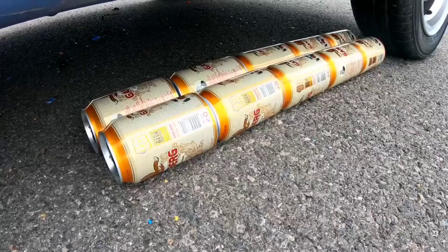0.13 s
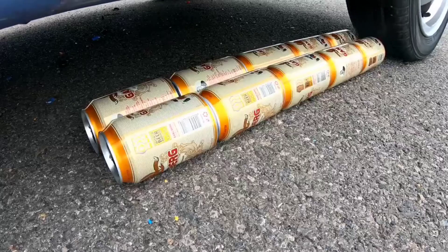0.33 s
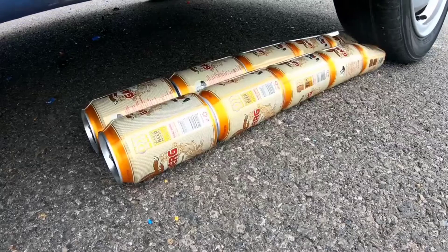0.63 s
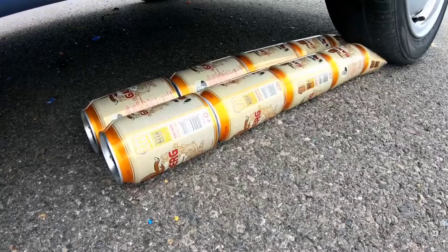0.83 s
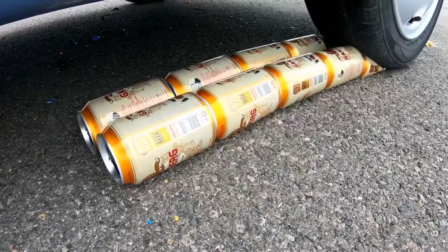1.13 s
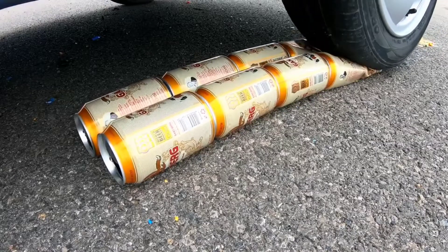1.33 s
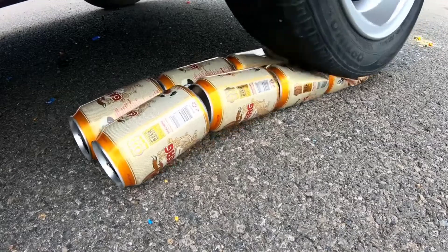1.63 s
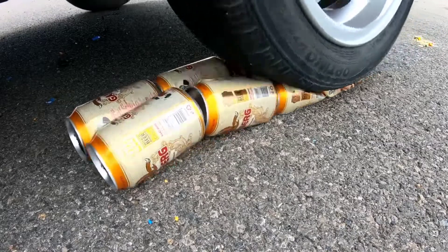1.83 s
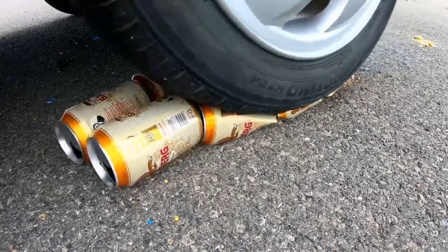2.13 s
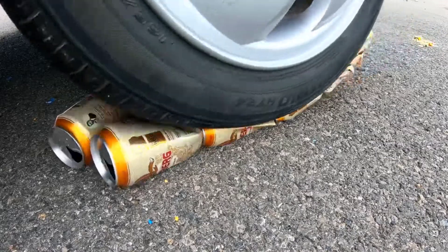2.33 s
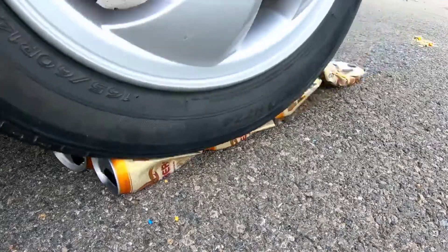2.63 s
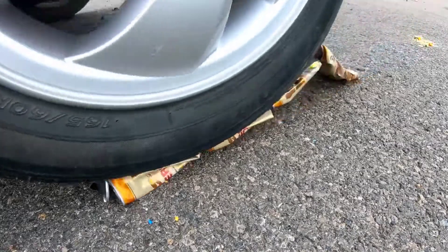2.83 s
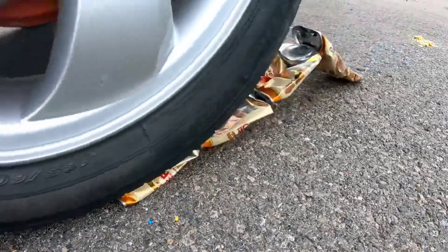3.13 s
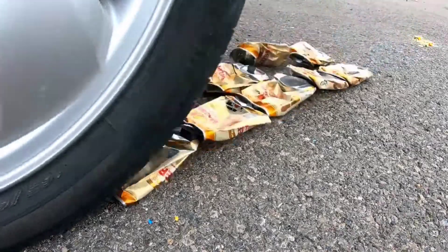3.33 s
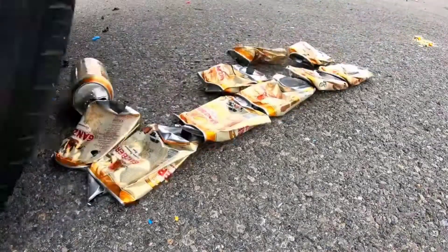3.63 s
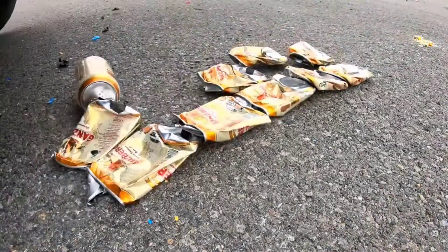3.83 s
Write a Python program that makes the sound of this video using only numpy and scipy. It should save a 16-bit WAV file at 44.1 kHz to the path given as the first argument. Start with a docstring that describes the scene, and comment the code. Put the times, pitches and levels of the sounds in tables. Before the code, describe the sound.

Empty metal cans are crushed by a car tyre on asphalt, close to a small camera. After brief silence, a low wavering engine hum with soft hiss starts at 0.13 s. From 0.8 to 3.3 s, dense crackles, sharp metallic snaps and hollow thumps crowd together, growing brighter and wider, treble leaning right. Then flattened cans scrape and tick until about 3.9 s, leaving faint engine hum.

```python
"""After a short silence an engine, heard by a small camera on the asphalt, hums as a wavering tone with hiss.
A car idles over two rows of empty metal cans: they puff hollow thumps (low damped sines) and crackle (tiny
rings and noise), and their walls buckle in sharp snaps (bursts of ringing noise). The sound widens, its treble
leaning right, as the wheel nears. Late on, flattened cans drag (rough noise rings the sheet) and spring back in
ticks (treble bursts), while the engine fades as the wheel rolls past."""
import sys
import numpy as np
from scipy import signal
from scipy.fft import rfft, irfft
from scipy.io import wavfile
from scipy.ndimage import uniform_filter1d

SR = 44100
rng = np.random.default_rng(int(sys.argv[2]) if len(sys.argv) > 2 else 0)


def gain_from_db(level_db):
    """Turn a decibel level (scalar or array-like) into a linear amplitude factor."""
    decades = np.asarray(level_db, float) / 20
    return 10 ** decades


def put_to_file(sound):
    """Save the sound as 16-bit audio at rate SR, in the file named by the first command-line argument."""
    columns = np.atleast_2d(sound).T  # one column per channel
    safe = np.clip(columns, -1, 1)
    whole_steps = np.round(safe * 32767)
    wavfile.write(sys.argv[1], SR, whole_steps.astype(np.int16))


N = 176400  # samples, 4 s
OPENS_S = 0.128

# engine over time: (time [s], firing tone [dB], whirr and hiss [dB], rumble [dB])
ENGINE_LEVELS = [(.14, -35, 1.5, -35), (.76, -34.5, 0.5, -38.5), (1.26, -41, -5, -44),
                 (1.48, -32, 3.5, -29), (1.75, -50, 0, -40), (2.06, -53, 4.5, -39), (2.2, -32.5, 5, -39),
                 (2.5, -35, -2, -32.5), (2.7, -46, -1.5, -41), (3.3, -44, -3, -33),
                 (3.75, -36.5, -10.5, -41.5), (3.88, -39.5, -16, -46.5), (4, -41, -21, -39)]
# colour of the engine hiss: (frequency [Hz], level [dB per Hz])
ENGINE_HISS_COLOUR = [(59, -13.5), (100, -3), (373, -6.5), (415, -9), (452, -11), (691, -19), (872, -14),
                      (950, -23.5), (1250, -17), (1720, -24.5), (2400, -21.5), (4000, -31), (4700, -31),
                      (6000, -43.5), (10000, -50), (16000, -76)]
# steady whirring tones of the engine: (average frequency [Hz], level [dB])
ENGINE_WHIRRS = [(226.1, -48), (463.0, -47.5), (796.7, -53.5), (1233, -49)]
FIRING_HZ, ENGINE_HISS_DB = 28.3, -33  # average firing pitch; hiss level beside the whirrs

# collapsing can bodies: (time [s], level [dB], pitch [Hz], a third of the periods taken to fade 60 dB [cycles])
CAN_THUMPS = [(0.537, -24.5, 86, 3.3), (0.873, -5.5, 228, 3.7), (0.946, -0.5, 240, 2.2),
              (1.039, -13.5, 254, 3.9), (1.156, -14, 330, 4.9), (1.194, -18.5, 363, 7.5),
              (1.273, -21, 383, 2.8), (1.365, -9.5, 320, 2.4), (1.435, -16, 330, 2.5),
              (1.622, -1, 286, 1.9), (1.673, -11.5, 149, 1.5), (1.704, -6, 166, 2.4), (1.821, -13, 303, 3),
              (1.846, -15.5, 302, 5.4), (1.877, -6.5, 297, 2.8), (1.925, -6.5, 317, 2.5),
              (1.95, -16, 170, 4.6), (1.979, -7.5, 163.5, 3), (2.055, -17, 138, 6.6),
              (2.128, -12.5, 140, 4.2), (2.144, -20, 355, 4), (2.2, -19, 125, 3.1), (2.268, -3.5, 155, 1.6),
              (2.365, -4.5, 141, 2.2), (2.372, -9, 335, 3.7), (2.405, -15.5, 145, 2.6),
              (2.545, -6.5, 415, 3.2), (2.624, -10.5, 149, 2.7), (2.73, -7.5, 352, 2.5),
              (2.746, -8.5, 150, 1.84), (2.81, -7, 436, 3.4), (2.85, -6, 400, 1.8), (2.902, -16, 382, 3.3),
              (2.936, -12, 377, 2.5), (2.973, -17, 255, 2.9), (3.031, 0, 236, 1.46), (3.089, -13, 283, 2.3),
              (3.153, -6.5, 370, 3.2), (3.236, -1, 175, 1.64), (3.453, -24, 109, 1.6),
              (3.61, -30.5, 100, 2.4)]
# air note of the last cans: (time [s], level [dB])
HOLLOW_LEVELS = [(2.6, -60), (2.9, -39.5), (3.3, -35), (3.75, -49.5), (3.85, -51)]
HOLLOW_HZ = 261.6
THUMP_LAG_S = 0.00526  # each thump starts this long after its listed time

# small crackle under the tyre: (time [s], level [dB], groan of the can walls relative to it [dB])
CRACKLE_LEVELS = [(.8, -34, 2), (0.849, -18.5, -9), (.89, -26, -2), (.93, -32.5, -26), (.96, -19.5, -6),
                  (.99, -44.5, -9), (1.04, -28, -15), (1.11, -39, -12), (1.172, -20, -11.5),
                  (1.22, -30.5, -9), (1.27, -17.5, -21), (1.32, -29, -11.5), (1.36, -22.5, -9),
                  (1.43, -27, -15), (1.47, -23, -11), (1.56, -31, -9), (1.65, -28.5, -12),
                  (1.71, -14.5, -18.5), (1.75, -25, -6.5), (1.79, -21, -11.5), (1.88, -18.5, -18),
                  (1.91, -24, -13), (1.96, -20.5, -5), (2.004, -35, -9), (2.03, -20.5, -10.5),
                  (2.08, -16.5, -12.5), (2.104, -23, -10.5), (2.145, -15, -6.5), (2.19, -24.5, -17),
                  (2.27, -26, -4), (2.33, -52, -3), (2.398, -17, -15), (2.47, -42, 6), (2.551, -25, -9),
                  (2.58, -30.5, -18), (2.63, -24.5, -5.5), (2.69, -32.5, -6), (2.74, -36.5, 2),
                  (2.87, -26.5, -4), (2.91, -28, -24), (2.96, -31, -7.5), (3.07, -39, 5.5),
                  (3.16, -22, -14), (3.2, -27, -3), (3.26, -31, -3), (3.4, -57, -12)]
GRAINS_PER_S = 900
CRACKLE_TREBLE_DB, TREBLE_RISE_DB_PER_S = -34.5, 5.5  # brighter as the wheel nears
# colour of the crackling walls and of the grit: (frequency [Hz], level [dB per Hz])
METAL_COLOUR = [(350, -24.5), (600, -1), (1450, 3), (2570, 3), (3730, 1), (4570, -4), (5500, -18.5),
                (7150, -50), (12100, -120)]
# colour of the treble crack: (frequency [Hz], level [dB per Hz])
TREBLE_COLOUR = [(3240, -42), (5500, 9.5), (7500, -6), (9300, 6.5), (11500, -14.5), (15500, -21)]
WALL_Q, WALL_SWING_DB = 21.5, 5.5  # sharpness of the wall resonances, how far each comes and goes

# wall buckles: (time [s], level [dB], low ring [Hz], high ring [Hz], high ring relative [dB],
# treble crack relative [dB], length [s])
WALL_SNAPS = [(0.85, -11.5, 596, 2030, -3.5, -10.5, 0.036), (0.866, -6.5, 640, 1520, -3.5, -36, 0.041),
              (0.88, -22.5, 1450, 1400, 15.5, -35, 0.018), (0.902, -8, 770, 2150, -10, -20, 0.021),
              (0.949, -8, 752, 1535, -0.5, -31, 0.024), (1.024, -26, 1450, 1470, -5, -14, 0.025),
              (1.048, -30, 501, 1580, 6, -28, 0.02), (1.081, -5.5, 1590, 1650, -21, -30, 0.023),
              (1.149, -19, 1230, 1980, 3, -26, 0.026), (1.167, -17, 1310, 2540, 4.5, -15, 0.022),
              (1.185, -13.5, 1457, 1830, 4.5, -36, 0.067), (1.198, -11, 1420, 1620, -9, -20, 0.029),
              (1.24, -22.5, 1430, 1460, 9.5, -15, 0.012), (1.253, -18.5, 1500, 1830, 7, -9.5, 0.047),
              (1.308, -17.5, 1430, 1525, 10, -42, 0.016), (1.335, -8.5, 775, 1500, -15, -32, 0.016),
              (1.348, -14.5, 1295, 4300, -3, -10.5, 0.035), (1.373, -21, 1320, 2230, 0, -21, 0.024),
              (1.393, -13.5, 1370, 2790, 7, -12, 0.021), (1.403, -10, 1460, 3530, 0, -23, 0.02),
              (1.434, -21, 507, 2000, 0, -35, 0.021), (1.447, -19, 1410, 2220, 5, -37, 0.022),
              (1.463, -6.5, 1155, 3720, -2, -44, 0.019), (1.497, -13.5, 507, 1980, -14, -26, 0.018),
              (1.523, -7, 1380, 1550, -24, -39, 0.028), (1.579, -9.5, 527, 3700, 4, -37, 0.013),
              (1.604, -3.5, 953, 1490, -8.5, -25, 0.021), (1.629, -11.5, 1370, 1950, 4, -42, 0.024),
              (1.672, -10.5, 1500, 1560, -2.5, -19, 0.02), (1.697, -10, 1240, 1700, -16, -25, 0.017),
              (1.771, -8, 475, 1990, -19, -22, 0.035), (1.794, -5.5, 550, 1640, -11, -13.5, 0.015),
              (1.857, -11, 1287, 1650, -16, -36, 0.052), (1.883, -2.5, 1173, 2730, -25, -23.5, 0.017),
              (1.928, -16.5, 830, 3730, 2, -12, 0.028), (1.959, -12, 820, 2440, -25, -11, 0.023),
              (1.963, -13, 920, 1500, -12, -31, 0.031), (1.982, -4.5, 786, 2375, -18, -33, 0.012),
              (2.02, -10.5, 1500, 3100, -5, -18, 0.027), (2.034, -9.5, 1410, 1640, -5, -12, 0.018),
              (2.058, -9.5, 1080, 3300, 0.5, -13, 0.028), (2.08, -11.5, 579, 3050, 1, -16.5, 0.032),
              (2.125, -8, 1020, 1990, -16, -43, 0.023), (2.138, -10, 920, 2120, -12, -27, 0.033),
              (2.219, -23, 496, 1500, 7, -31, 0.03), (2.22, -20, 1490, 3510, 8.5, -27, 0.018),
              (2.243, -8.5, 1100, 3730, -6, -31, 0.017), (2.261, -8.5, 520, 3130, -0.5, -36, 0.036),
              (2.272, -6, 1494, 1446, -12, -42, 0.018), (2.305, -12, 1340, 1816, 5, -42, 0.016),
              (2.338, -18, 550, 3980, 6.5, -25, 0.01), (2.348, -13.5, 1260, 3000, -12, -21, 0.015),
              (2.355, -9, 610, 1760, -3.5, -29, 0.022), (2.389, -5.5, 1020, 1745, -6, -14, 0.0063),
              (2.417, -7, 636, 1755, -1.5, -11.5, 0.0037), (2.441, -8, 514, 3210, -1, -22, 0.015),
              (2.479, -14, 960, 3100, 1.5, -36, 0.015), (2.493, -7, 1170, 2180, -18, -15.5, 0.012),
              (2.543, -2.5, 985, 1780, -8.5, -23, 0.0074), (2.601, -9, 495, 3690, 3.5, -42, 0.01),
              (2.627, -4.5, 700, 1935, -2, -16.5, 0.0058), (2.705, -19.5, 1080, 2350, 1.5, -21, 0.02),
              (2.729, -8.5, 510, 2430, -2.5, -21, 0.0098), (2.743, -15.5, 520, 2470, 1, -18, 0.022),
              (2.756, -21.5, 523, 2500, -8, -1, 0.012), (2.779, -9, 560, 2830, -7, -8, 0.0049),
              (2.816, -16, 483, 1620, -19, -9.5, 0.02), (2.829, -19, 600, 4500, -3, -5, 0.01),
              (2.835, -11, 643, 1660, -17, -24, 0.021), (2.858, -17, 925, 3670, 5, -9.5, 0.044),
              (2.88, -8, 1250, 1800, -11, -15, 0.026), (2.924, -12, 667, 5100, -1, -16.5, 0.028),
              (2.946, -12, 900, 3000, -1, -37, 0.026), (2.952, -17, 1030, 2870, -18, -38, 0.028),
              (2.977, -10.5, 530, 2130, -21, -33, 0.031), (2.986, -27, 1210, 3000, -10, 1, 0.013),
              (2.99, -6.5, 2060, 4170, -1.5, -12, 0.021), (2.999, -25, 2000, 3570, 5, -20, 0.014),
              (3.016, -32, 1500, 4500, 10, -17, 0.01), (3.032, -10, 980, 1900, -4, -18, 0.022),
              (3.04, -11, 730, 2070, -19, -22, 0.026), (3.094, -10, 510, 2090, -5.5, -9.5, 0.021),
              (3.127, -22, 708, 2630, 6, -3, 0.012), (3.166, -15.5, 726, 1970, 2, -9, 0.049),
              (3.217, -20.5, 815, 1940, 8.5, -8, 0.013), (3.244, -14.5, 835, 2300, -12, -9, 0.029),
              (3.287, -14.5, 527, 2130, -6, -12, 0.028), (3.308, -15, 1300, 3620, -0.5, -5, 0.014),
              (3.404, -12.5, 760, 2850, -27, -29, 0.031), (3.519, -18.5, 1320, 2460, 0.5, -9, 0.017),
              (3.542, -9.5, 1090, 5320, 6.5, -6, 0.0049), (3.598, -19, 920, 2310, -5, -14, 0.025),
              (3.614, -20, 1030, 1500, 0, -15, 0.03), (3.6242, -5.5, 1830, 3200, -10.5, -13, 0.016),
              (3.642, -17.5, 1160, 1890, 3, -17, 0.031), (3.71, -18, 1385, 1680, -24, -9, 0.031),
              (3.756, -11, 745, 2820, 2.5, -8.5, 0.032), (3.916, -34, 920, 3200, -15, -24, 0.031)]
# ringing tones of a can: (frequency [Hz], level [dB], decay time before a stretch and a 0.12 s cap [s])
CAN_MODES = [(221, -20, 0.24), (465.2, 14, 0.22), (1210, -34, 0.64), (1500, -28, 0.52)]
SNAP_CYCLES, TAIL_T60_S = 18.6, 0.09
RISE_SHARE, CRACK_SHARE = 0.074, 0.18  # parts of a snap's length

# flattened cans dragging on the asphalt: (time [s], level [dB])
DRAG_LEVELS = [(3.25, -31.5), (3.38, -35.5), (3.42, -27.5), (3.53, -35), (3.6, -34.5), (3.66, -29),
               (3.72, -29.5), (3.8, -34), (3.86, -32.5), (3.885, -52), (3.93, -60)]
# what the flattened sheet rings with: (frequency [Hz], width before broadening [Hz], level [dB])
SHEET_RINGS = [(805, 104, 7.5), (1110, 47, 10), (1810, 45, 6), (2060, 33, -5), (2640, 52, 6.5),
               (3200, 28, 5.5)]
# bright ticks as the flattened cans spring back: (time [s], level [dB], pitch [Hz])
SPRING_TICKS = [(3.3923, -25, 4500), (3.4255, -23.5, 5900), (3.469, -20, 4000), (3.495, -27, 3900),
                (3.558, -18.5, 2700), (3.684, -24.5, 4000), (3.7339, -21, 3900), (3.7796, -22, 3510)]

# colour of the sideways spread: (frequency [Hz], level [dB])
SIDE_COLOUR = [(60, -8.5), (110, -17), (200, -18), (380, -21.5), (700, -11.5), (1290, -10), (2380, -6.5),
               (4400, -4.5), (8120, 0), (15000, 4.5)]
# stereo width as the wheel nears: (time [s], treble [dB], bass and middle [dB])
WIDTH_LEVELS = [(0, -14, -29), (2.15, -15.5, -27.5), (2.5, -4, -10), (2.8, -1.5, -5), (3.3, -1, -3),
                (4, -1.5, 0.5)]
# the camera housing colours everything: (frequency [Hz], level [dB])
HOUSING_COLOUR = [(4000, 0), (4650, 2), (5600, -4), (7000, 0.5), (8200, -0.5), (10400, -1), (11500, -5.5),
                  (14500, -2), (16000, -22)]


def col(table, t, k):
    """Column k of a curve table at times t."""
    return np.interp(t, np.array(table)[:, 0], np.array(table)[:, k])


def unit(x):
    """Scale to rms 1."""
    return x / np.sqrt(np.mean(x ** 2))


def colour(x, table, size=2048):
    """Causal minimum-phase filter from (frequency [Hz], level [dB]) points."""
    a = np.array(table)
    hz = np.arange(size // 2 + 1) * SR / size
    log_gain = np.interp(np.log(hz + 1), np.log(a[:, 0]), a[:, 1]) * np.log(10) / 20
    # folding the cepstrum forward in time makes the filter minimum-phase
    cepstrum = irfft(log_gain)
    cepstrum[1:size // 2] *= 2
    cepstrum[size // 2 + 1:] = 0
    return signal.fftconvolve(x, irfft(np.exp(rfft(cepstrum))))[:len(x)]


def walk(rate):
    """Random levels held 1 / rate s and slewed; spread near 1."""
    k = int(SR / rate)
    held = np.repeat(rng.standard_normal(N // k + 1), k)
    return 1.338 * uniform_filter1d(uniform_filter1d(held, k), k)[:N]


def fade(t, t60):
    """Exponential decay, down 60 dB after t60 seconds."""
    return np.exp(-np.log(1000) * t / max(t60, 1e-3))


def add(out, s, x):
    """Mix x in at time s."""
    i = int(s * SR)
    out[i:i + len(x)] += x[:len(out) - i]


def ring(hz, cycles, rise_s):
    """A damped sine that loses 60 dB in 3 x cycles periods."""
    t = np.arange(int(3 * cycles / hz * SR)) / SR
    rise = 1 - np.exp(-t / max(rise_s, 1e-5))
    return np.sin(2 * np.pi * hz * t) * fade(t, 3 * cycles / hz) * rise


def band(hz, q, count):
    """Noise ringing in one resonance of sharpness q, rms 1."""
    b, a = signal.iirpeak(min(hz, 0.45 * SR), max(q, 0.3), SR)
    return unit(signal.lfilter(b, a, rng.standard_normal(count + 400))[400:])


def engine(t):
    """A wavering firing tone, faint whirring tones, rumble, and broad noise that throbs with the firings."""
    phase = 2 * np.pi * np.cumsum(FIRING_HZ * (1 + 0.0954 * walk(7.0))) / SR
    firing = np.sqrt(2) * np.sin(phase) * gain_from_db(col(ENGINE_LEVELS, t, 1) + 0.5 * walk(14))
    hiss = unit(colour(rng.standard_normal(N), ENGINE_HISS_COLOUR, size=8192))
    hiss = hiss * (1 + 0.28 * np.sin(phase)) * gain_from_db(1.2 * walk(9))
    whirr = np.zeros(N)
    for hz, db in ENGINE_WHIRRS:
        whirr_phase = 2 * np.pi * np.cumsum(hz * (1 + 0.0075 * walk(10))) / SR
        whirr += gain_from_db(db + 2 * walk(35)) * np.sin(whirr_phase)
    rumble = gain_from_db(col(ENGINE_LEVELS, t, 3) - 0.5 + 3.3 * walk(5.99)) * band(51.5, 1.47, N)
    return firing + rumble + gain_from_db(col(ENGINE_LEVELS, t, 2)) * (gain_from_db(ENGINE_HISS_DB) * hiss + whirr)


def thumps(t):
    """A can caves in and pushes out its air in a few low cycles; the last cans hum like blown bottles."""
    out = np.zeros(N)
    for s, db, hz, cycles in CAN_THUMPS:
        start, cycles = s + THUMP_LAG_S, max(cycles, 0.7)
        add(out, start, gain_from_db(db + 6.5) * ring(hz, cycles, 0.0055))
        add(out, start, gain_from_db(db - 2.5) * ring(1.845 * hz, cycles, 0.0015))
        add(out, start, gain_from_db(db) * ring(0.66 * hz, 1.0, 0.011))
        # the can's hollow rattles on
        add(out, start, gain_from_db(db - 14.5) * fade(t[:2500], 0.06) * band(333.0, 4.0, 2500))
    return out + gain_from_db(col(HOLLOW_LEVELS, t, 1)) * band(HOLLOW_HZ, 25.0, N)


def walls():
    """Dented walls: many narrow resonances that wake and die on their own as the creases move."""
    patches = np.zeros(N)
    for hz in 450 * 11.0 ** np.linspace(0, 1, 20):
        patches += np.sqrt(hz) * gain_from_db(WALL_SWING_DB * walk(45)) * band(hz, WALL_Q, N)
    return unit(colour(unit(patches) + gain_from_db(-8) * rng.standard_normal(N), METAL_COLOUR))


def crackle(t):
    """Many tiny creases: clicks of widely scattered size, each ringing a few cycles at its own pitch."""
    first, last = CRACKLE_LEVELS[0][0], CRACKLE_LEVELS[-1][0]
    rings, pings, clicks = np.zeros((3, N))
    patch = 0.5 + 0.5 * np.tanh(0.8 * walk(35))  # the patch of wall that is creasing sets the pitch
    for place, chance, p, q in rng.random((int(GRAINS_PER_S * 4), 4)):
        s = place * N / SR
        size = min((1 - chance) ** -0.6, 8.0)  # mostly small, a few large
        hz = 600 * 7.59 ** (0.583 * p + 0.487 * patch[int(place * N)])
        add(rings, s, size * ring(hz, 4.5 + 9 * q, 0.00016))
        add(pings, s, size * ring(4500 * 1.8 ** q, 6 + 25 * p, 0.0001) * gain_from_db(-9 * q))
        clicks[int(s * SR)] += size
    puff = signal.fftconvolve(clicks, fade(np.arange(1500) / SR, 0.016))[:N]
    mids = unit(rings) + gain_from_db(2) * unit(puff * walls())
    treble = unit(puff * colour(rng.standard_normal(N), TREBLE_COLOUR)) + gain_from_db(-17) * unit(pings)
    treble = gain_from_db(CRACKLE_TREBLE_DB + TREBLE_RISE_DB_PER_S * (t - first)) * treble
    groan = gain_from_db(4.18 * walk(25.45)) * (band(187.0, 1.32, N) + 0.83 * band(357.0, 3.4, N))
    groan = gain_from_db(col(CRACKLE_LEVELS, t, 2)) * groan
    on = np.clip((t - first) / 0.044, 0, 1) * np.clip((last - t) / 0.023, 0, 1)
    return on * gain_from_db(col(CRACKLE_LEVELS, t, 1) + 1.55 * walk(60)) * (0.49 * mids + treble + groan)


def snaps():
    """Each buckle shakes two patches of wall for its length, rattles, cracks in the treble and rings the can."""
    tone, body, treble, hits = np.zeros((4, N))
    t = np.arange(3000) / SR
    # the rattle builds after the first crack
    rattle = (1 - np.exp(-t / 0.0034)) * fade(t, TAIL_T60_S)
    for s, db, low_hz, high_hz, high_db, treble_db, length in WALL_SNAPS:
        shape = 1.7 * fade(t, length) * (1 - np.exp(-t / max(RISE_SHARE * length, 1e-5)))
        # noise: the two patches, a broad wash, a treble burst at a random pitch
        patches = gain_from_db(-11.0) * band(low_hz, 18.0, len(t)) + gain_from_db(high_db - 13.5) * band(high_hz, 26.0, len(t))
        add(tone, s, gain_from_db(db) * shape * patches)
        add(tone, s, gain_from_db(db - 17.0) * shape * band(np.sqrt(low_hz * high_hz) * 0.71, 0.93, len(t)))
        add(tone, s, gain_from_db(db + treble_db - 4.5) * shape * band(5200 * 2.0 ** rng.random(), 6.3, len(t)))
        # damped sines: low ring, high ring, a very short treble click
        add(tone, s, gain_from_db(db - 5.5) * ring(low_hz, max(0.48 * length * low_hz, 1), 0.0008))
        add(tone, s, gain_from_db(db + high_db - 2.5) * ring(high_hz, SNAP_CYCLES, 0.00024))
        add(tone, s, gain_from_db(db + treble_db + 17.5) * ring(4500.0, 0.63, 0.00003))
        # loudness curves for the wall rattle and the treble crack
        add(body, s, gain_from_db(db - 6.5) * (shape + rattle))
        add(treble, s, gain_from_db(db + treble_db) * (fade(t, CRACK_SHARE * length) + gain_from_db(-8) * rattle))
        add(hits, s, gain_from_db(db) * np.ones(1))
    tears = unit(gain_from_db(3.7 * walk(250)))  # the rattle comes in jagged tears
    t = np.arange(8000) / SR
    modes = np.zeros(len(t))
    for hz, db, t60 in CAN_MODES:
        modes += gain_from_db(db) * np.sin(2 * np.pi * hz * t) * fade(t, min(1.8 * t60, 0.12))
    can = signal.fftconvolve(hits, modes / np.abs(modes).max())[:N]
    crack = treble * unit(colour(rng.standard_normal(N), TREBLE_COLOUR))
    return tone + gain_from_db(-6.5) * body * tears * walls() + gain_from_db(-6.5) * crack + gain_from_db(-23) * can


def drag(t):
    """Clustered stick-slip on the grit, each slip a short scuff, rings the flattened sheet."""
    slips = (rng.random(N) < 0.03) * gain_from_db(3.6 * walk(40)) * rng.exponential(size=N)
    scuffs = signal.fftconvolve(slips, fade(np.arange(600) / SR, 0.015))[:N] * rng.standard_normal(N)
    sheet = np.zeros(N)
    for hz, width, db in SHEET_RINGS:
        b, a = signal.iirpeak(hz, hz / max(1.1 * width, 60), SR)
        sheet += gain_from_db(db) * signal.lfilter(b, a, scuffs)
    sheet = colour(sheet, [(3000, 2), (6000, 1.5), (14000, -5)])
    grit = gain_from_db(-2.5) * unit(colour(scuffs, METAL_COLOUR))
    first, last = DRAG_LEVELS[0][0], DRAG_LEVELS[-1][0]
    on = np.clip((t - first) / 0.068, 0, 1) * np.clip((last - t) / 0.024, 0, 1)
    return on * gain_from_db(col(DRAG_LEVELS, t, 1)) * (unit(sheet) + grit)


def ticks():
    """The springing metal gives short treble bursts of noise, each around one pitch."""
    out, t = np.zeros(N), np.arange(1500) / SR
    for s, db, hz in SPRING_TICKS:
        burst = band(hz, 6.3, len(t)) + 0.46 * band(hz, 0.9, len(t))
        add(out, s, gain_from_db(db - 6) * fade(t, 0.019) * burst)
    return colour(out, [(5000, 2.5), (15000, -6)])


def scene():
    """Nearly mono; the sound spreads and its treble leans right as the wheel nears, its place ever shifting."""
    t = np.arange(N) / SR
    mid = engine(t) + thumps(t) + crackle(t) + snaps() + drag(t) + ticks()
    # two short random smears of the sound, blended by a wandering angle
    scatter = rng.standard_normal((2, 300)) * fade(np.arange(300) / SR, 0.0084)
    a, b = (signal.fftconvolve(mid, v / np.linalg.norm(v))[:N] for v in scatter)
    turn = 3 * walk(40)  # radians
    spread = colour(a * np.cos(turn) + b * np.sin(turn), SIDE_COLOUR)
    low = signal.sosfilt(signal.butter(6, 4000, "low", fs=SR, output="sos"), spread)
    high = signal.sosfilt(signal.butter(6, 4000, "high", fs=SR, output="sos"), spread)
    # taking treble from the left and giving it to the right makes the lean
    high -= 0.3 * signal.sosfiltfilt(signal.butter(2, 6000, "high", fs=SR, output="sos"), mid)
    side = gain_from_db(col(WIDTH_LEVELS, t, 1)) * high + gain_from_db(col(WIDTH_LEVELS, t, 2)) * low
    return np.array([mid + side, mid - side]) * np.clip((t - OPENS_S) / 0.0054, 0, 1)


def roll_off(x):
    """The treble ends steeply here."""
    return signal.sosfilt(signal.butter(12, 16280, fs=SR, output="sos"), x)


def record(dry):
    """The camera housing colours the treble; the camera rounds the loudest peaks and cuts the top."""
    housed = np.array([colour(channel, HOUSING_COLOUR) for channel in dry])
    rounded = np.tanh(0.79 * housed) / 0.78
    top_cut = signal.ellip(8, 0.3, 70, 15700, fs=SR, output="sos")
    mix = signal.sosfilt(top_cut, rounded)
    return roll_off(mix)


dry = scene()
out = record(dry)
put_to_file(out)
```